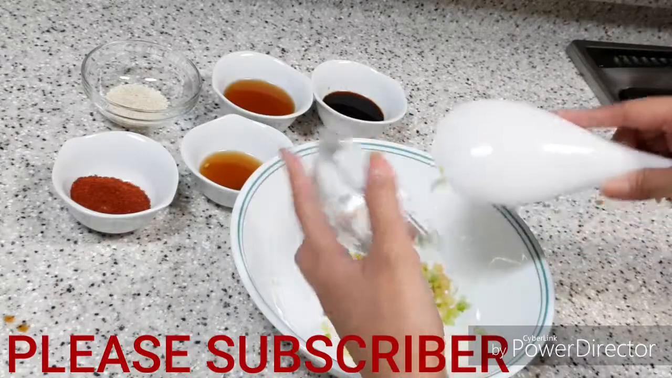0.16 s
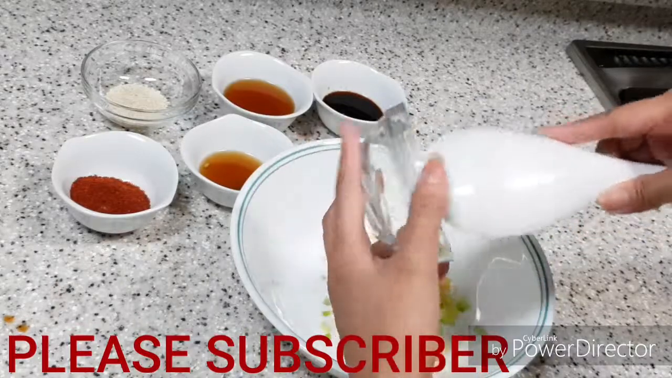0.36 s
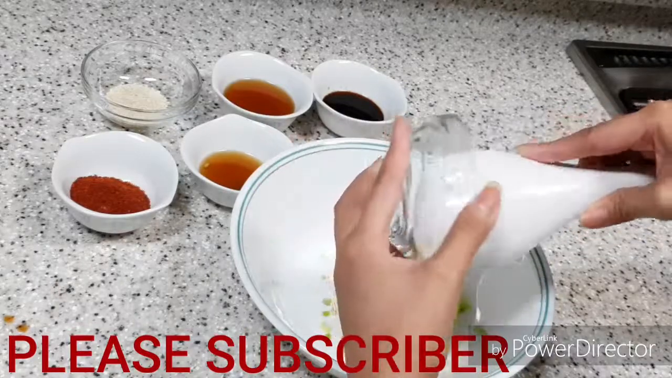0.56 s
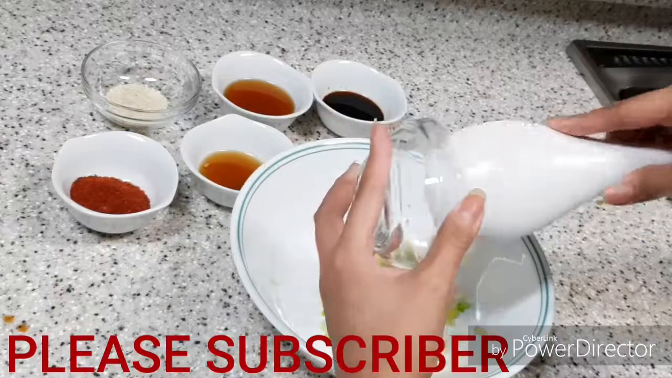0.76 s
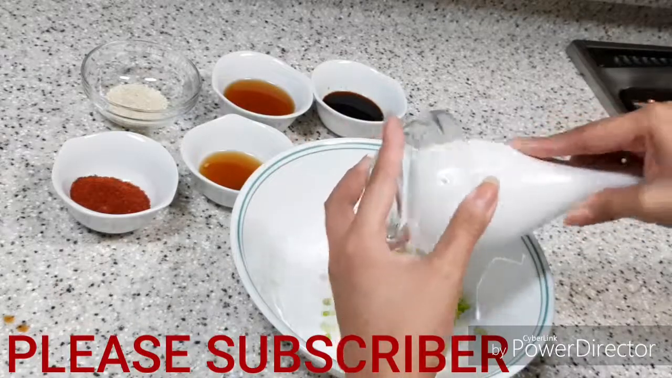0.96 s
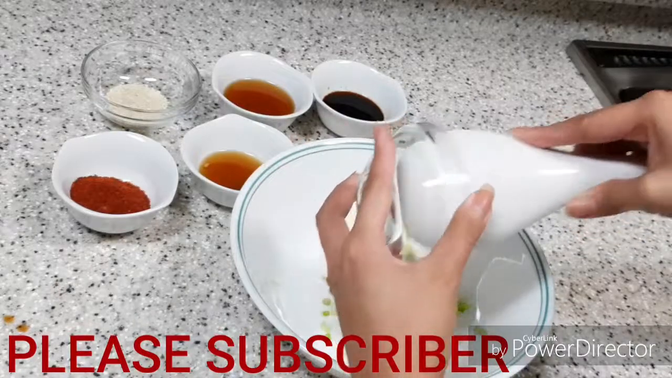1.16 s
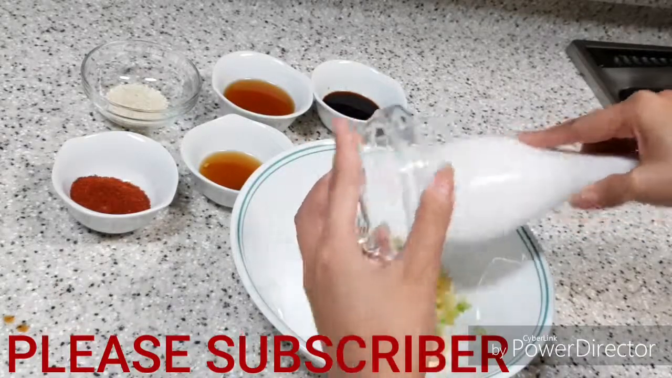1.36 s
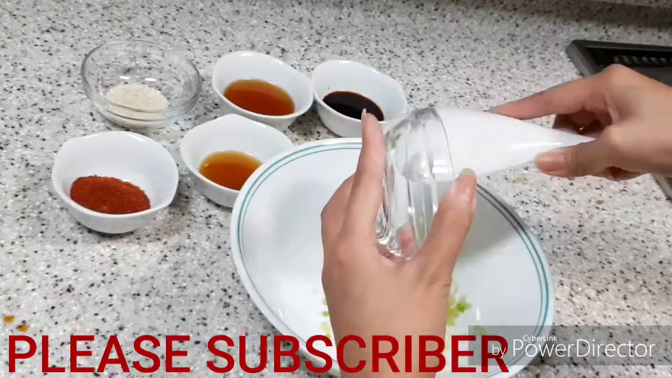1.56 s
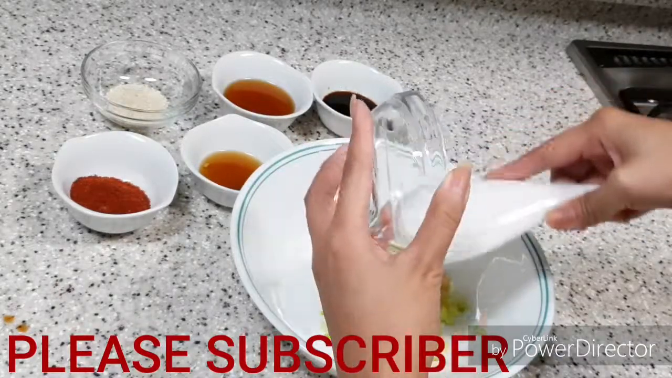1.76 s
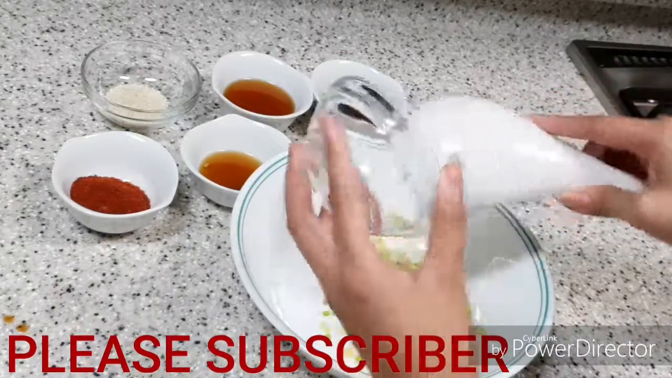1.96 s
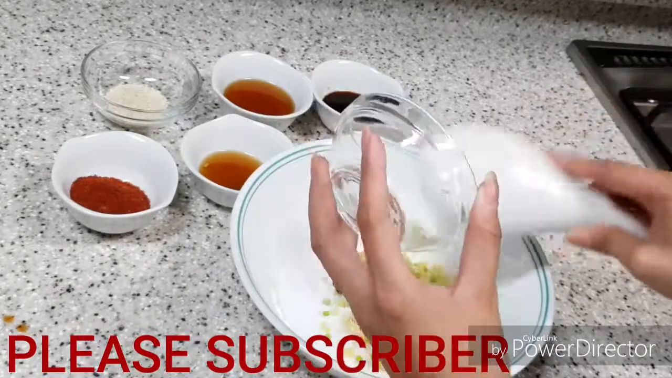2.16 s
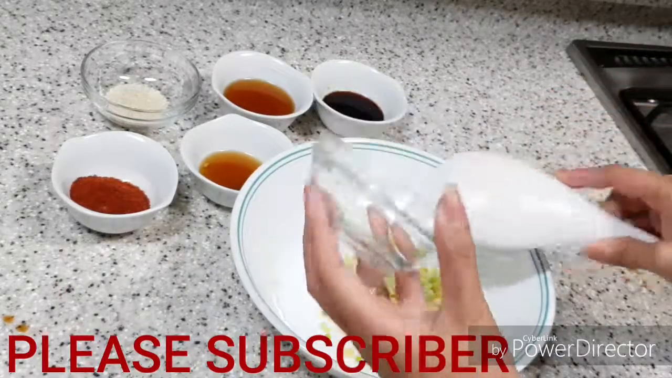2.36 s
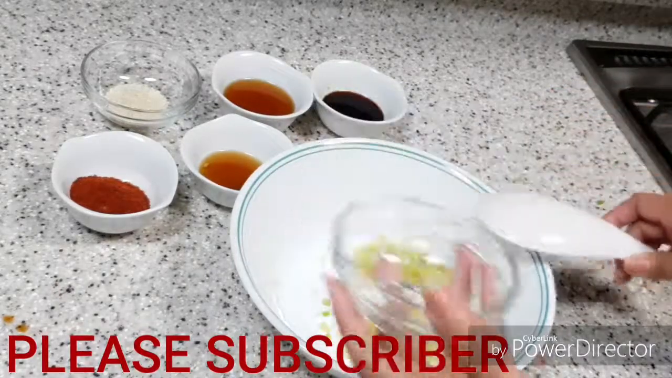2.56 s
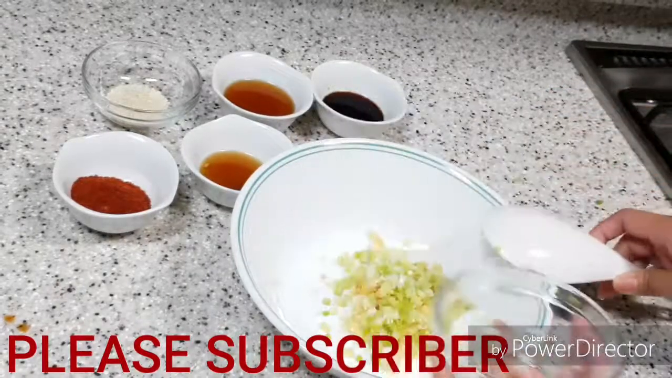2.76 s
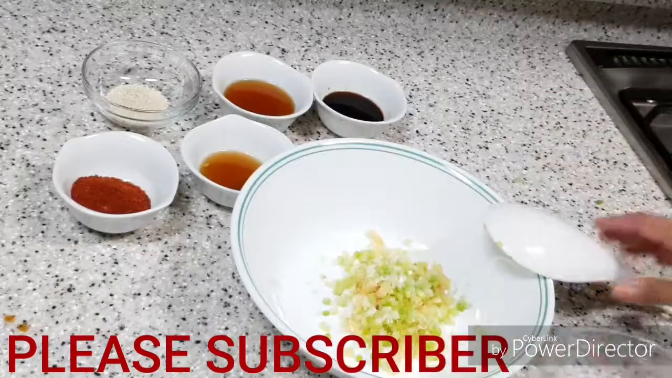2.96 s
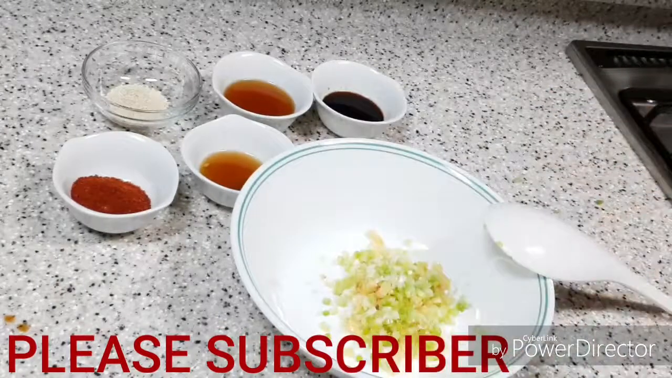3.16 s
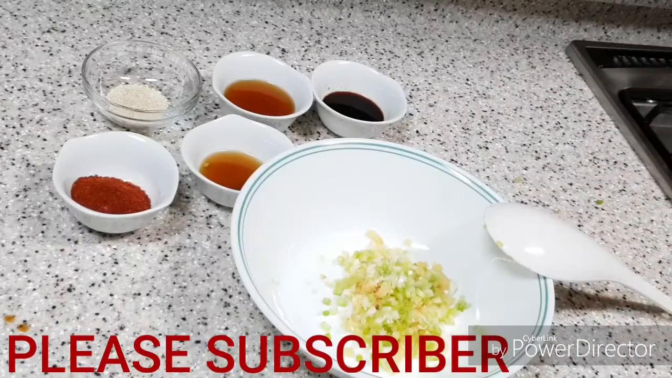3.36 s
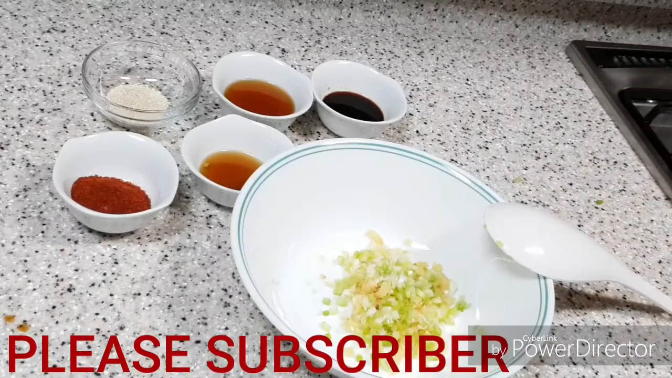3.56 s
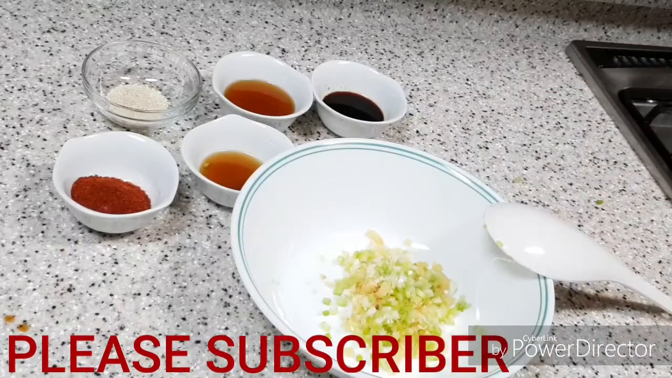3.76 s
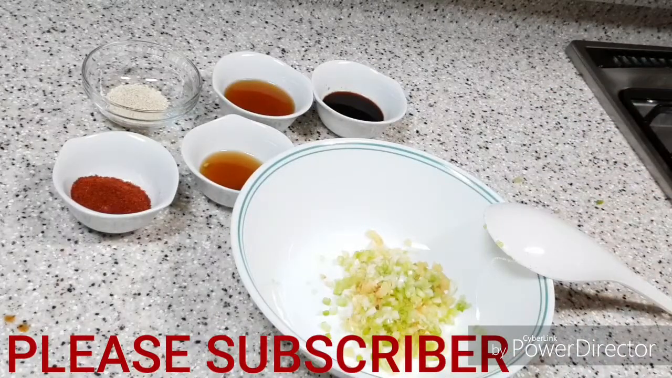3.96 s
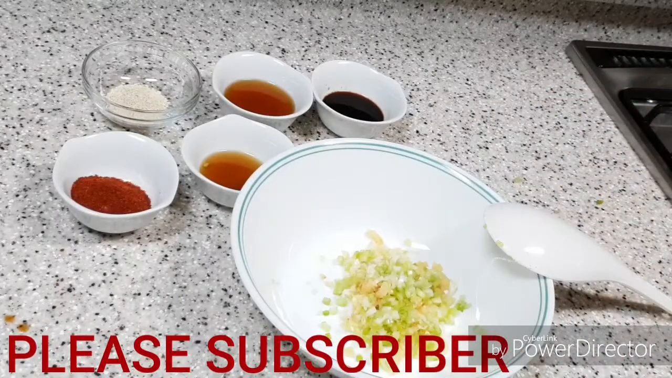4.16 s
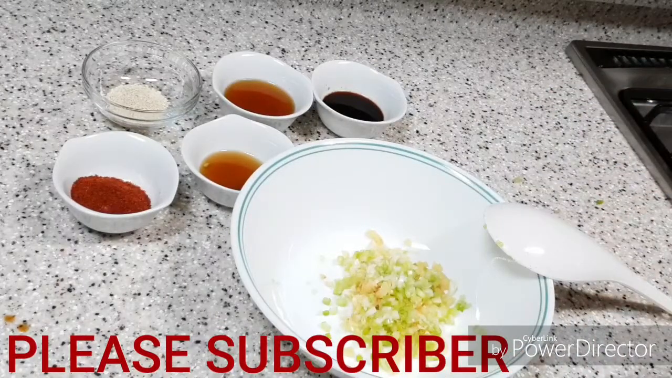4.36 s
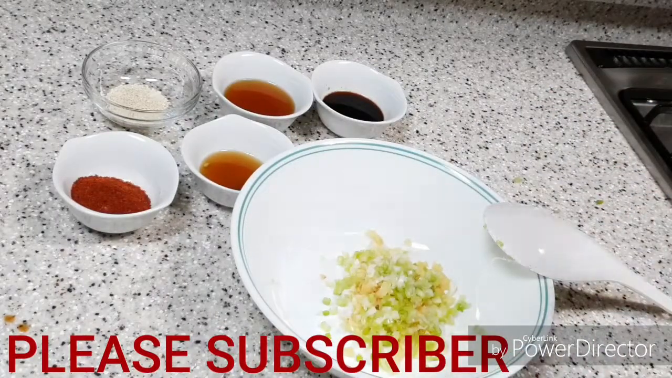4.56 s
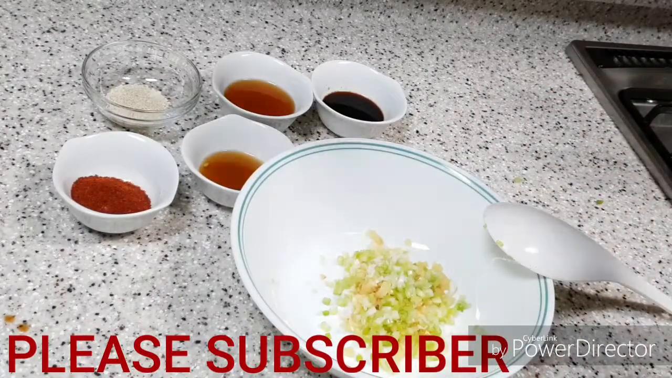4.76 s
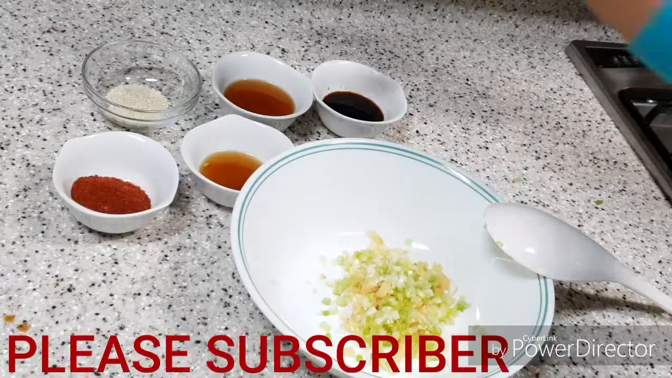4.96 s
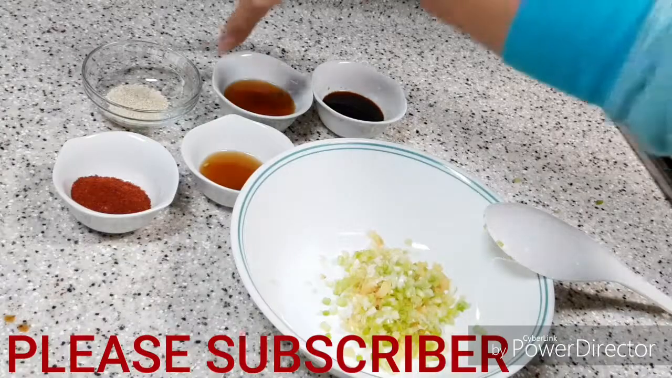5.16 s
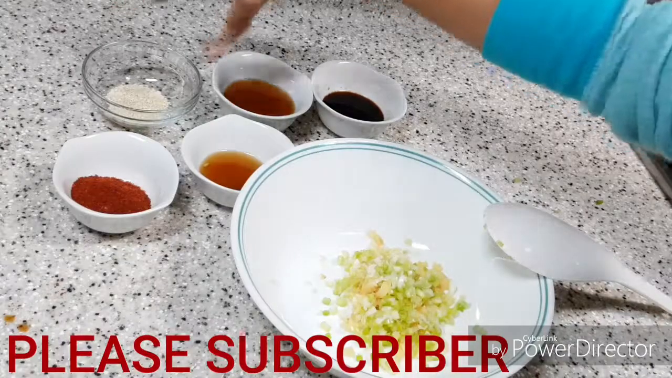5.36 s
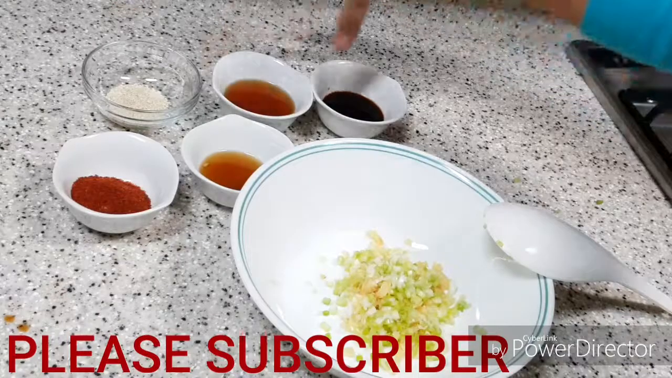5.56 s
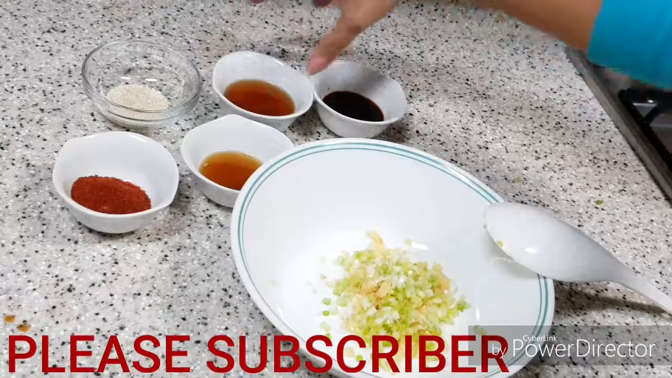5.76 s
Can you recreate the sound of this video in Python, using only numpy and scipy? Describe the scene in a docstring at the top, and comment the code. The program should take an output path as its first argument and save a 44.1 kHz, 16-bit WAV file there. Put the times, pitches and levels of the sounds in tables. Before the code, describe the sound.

Quick dry clinks of spoon on hand-held glass, two brighter ceramic clacks, and a short glass knock on stone over faint kitchen fan noise.

```python
"""Taps and scrapes of a plastic spoon on a small hand-held glass bowl, two drops on a ceramic rim, then the
glass bowl set down on stone: heard close to the microphone in a small hard kitchen.
Each blow is a noise crack, a short knock, a thud and a kick into ringing modes; rubbing is many tiny clicks.
Dense reflections come back from the walls. Behind lie a faint fan, made of shaped noise, and two low hums
that beat, made of sines."""
import sys
import numpy as np
from scipy import signal
from scipy.fft import rfft, irfft
from scipy.io import wavfile

SR = 44100
rng = np.random.default_rng(int(sys.argv[2]) if len(sys.argv) > 2 else 0)


def wrap_up_sound(samples):
    """Save the sound to the file named by the first command line argument, as 16-bit audio."""
    columns = np.atleast_2d(samples).T
    # keep every value between -1 and 1, then stretch to whole-number steps
    tamed = np.clip(columns, -1, 1)
    steps = np.round(tamed * 32767).astype(np.int16)
    wavfile.write(sys.argv[1], SR, steps)


def volts_from_decibels(level):
    """Turn decibel levels (scalar or array-like) into linear amplitude factors."""
    exponent = np.asarray(level, float) / 20
    return 10 ** exponent


N = 256220   # length [samples]
LEAD = SR // 10   # samples rendered ahead, for a tap that is already dying away

# Blows of spoon on glass, spoon on ceramic rim, and glass on stone:
# (time [s], crack level [dB], crack top [Hz], knock pitch [Hz], knock level [dB], ringing level [dB])
GLASS_TAPS = [(-.012, -22, 9100, 3980, -25.5, -31.5), (.115, -72, 900, 500, -44.5, -90),
              (.546, -29, 10300, 3020, -49, -40), (.705, -26.5, 4500, 4550, -31.5, -37),
              (.7295, -39, 5000, 4650, -23, -43), (.7345, -32.5, 4500, 2200, -39, -41.5),
              (.747, -44, 3000, 1480, -34, -35), (1.020, -26, 8600, 1690, -19.5, -57),
              (1.028, -39.5, 2990, 1393, -27.5, -55), (1.038, -22.5, 14000, 2020, -22.5, -31.5),
              (1.331, -25, 10400, 1640, -17.5, -47), (1.333, -40, 7980, 4100, -23.5, -52),
              (1.405, -17.5, 6340, 2093, -17, -28.5), (1.408, -30.5, 6000, 5560, -31, -31.5),
              (1.417, -21.5, 4010, 1370, -25.5, -49.5), (1.424, -41, 9030, 4500, -26.5, -37),
              (1.658, -23.5, 14000, 1960, -20.5, -39), (1.661, -25, 12000, 2856, -25, -42),
              (1.664, -40, 4020, 1180, -30, -44.5), (1.680, -31, 9100, 4500, -37.5, -40)]
RIM_DROPS = [(2.712, -12.5, 13000, 1927, -19.5, -18.5), (2.722, -20, 9000, 3890, -19, -34),
             (2.83, -21, 11100, 2810, -21, -40.5), (2.858, -43.5, 1000, 2440, -44, -26),
             (2.953, -11.5, 13000, 2914, -16, -26), (2.970, -18, 11980, 1850, -22.5, -49.5),
             (2.983, -18, 12000, 3420, -27, -38)]
STONE_BLOWS = [(4.129, -38, 2580, 1262, -31.5, -56), (4.137, -43, 2600, 1770, -46.5, -53.5),
               (4.150, -19, 14700, 1126, -25.5, -36), (4.162, -20.5, 10000, 4500, -19.5, -24.5),
               (4.169, -26.5, 9130, 902, -24.5, -39.5)]
# Strokes of dense small contacts on glass, rim and counter:
# (start [s], end [s], first level [dB], last level [dB], groan pitch [Hz], groan level [dB])
GLASS_SCRAPES = [(0.706, .720, -34, -33, 2100, -22), (.744, .774, -31, -38, 2185, -25),
                 (1.078, 1.105, -39, -38, 786, -19), (1.108, 1.126, -40.5, -39.5, 2290, -15),
                 (1.098, 1.15, -41, -44, 600, -18), (1.132, 1.156, -39.5, -39, 2060, -15),
                 (1.126, 1.15, -36, -42, 4480, -24), (1.372, 1.43, -36, -24, 1300, -24),
                 (1.884, 1.92, -68, -72, 1400, -8)]
RIM_CHATTER = [(2.723, 2.743, -19, -36.5, 3400, -29.5), (2.831, 2.87, -35.5, -47, 2353, -27),
               (2.96, 3, -20.5, -31, 3400, -31.5)]
COUNTER_CHATTER = [(4.154, 4.171, -24.5, -23.5, 1908, -19.5)]
# Ringing modes; the finger-damped glass has close pairs: (frequency [Hz], level [dB], 60 dB decay [s])
GLASS_MODES = [(520, -12, .08), (1330, -9, .07), (2900, -12, .1), (2020, -3, .12), (2160, -5, .1),
               (2240, -5, .16), (2560, -12, .16), (3955, -9, .15), (4400, -5, .14), (4500, -2, .18),
               (4570, -3, .15), (4700, -7, .08), (7760, -6, .1), (7870, -2, .15), (7955, -4, .17),
               (8100, -7, .1), (12080, -13, .09), (12240, -12, .09)]
CERAMIC_MODES = [(255, -12, .18), (385, -10, .1), (3945, -7, .12), (4237, -5, .1), (7560, -5, .07),
                 (10920, -8, .1), (12810, -12, .14), (1523, -8, .42), (2400, -9, .36), (3440, -6.5, .25),
                 (4640, -3, .2)]
GLASS_ON_STONE_MODES = [(175, 0, .1), (950, 0, .14), (2690, -4, .12), (4445, -6, .1), (7880, -4, .1),
                        (12170, -8, .08), (13170, -3, .12), (3040, -8, .15), (340, -5, .13), (415, -6, .1),
                        (575, -10, .15), (605, -11, .12), (785, -12, .12), (1330, -7, .14), (1855, 3, .055)]
# Broad colour of the cracks, and of plastic scraping on glass: (frequency [Hz], width [Hz], boost [dB])
GLASS_COLOUR = [(1700, 770, 7), (2860, 1300, 11), (4530, 540, 6), (7400, 3900, 8), (9100, 1800, -2.5),
                (12100, 3400, 9)]
RIM_COLOUR = [(4700, 6500, 5.5), (7450, 470, 9), (5940, 370, 3.8)]
STONE_COLOUR = [(940, 170, -1.5), (2040, 2700, 15.5), (7270, 2600, 11.5), (9100, 860, -6),
                (13000, 5400, 5.5)]
SCRAPE_COLOUR = [(532, 2800, -8), (2027, 87, 4), (3420, 1100, 7), (4500, 400, 1)]
# How long the kitchen rings: (frequency [Hz], 60 dB decay [s])
ROOM_DECAY = [(120, 0.27), (500, .42), (1500, 0.31), (4000, 0.34), (8000, 0.31), (14000, .24)]
# How alike the reflections are at left and right: (frequency [Hz], likeness [-1 to 1])
ROOM_LIKENESS = [(120, .9), (400, .9), (900, .2), (2000, -.1), (8000, -.3)]
# Relative spectrum of the fan's air noise: (frequency [Hz], density [dB per Hz])
FAN_SPECTRUM = [(20, -26), (45, -9.5), (88, -5), (177, -13.5), (215, -19), (399, -13), (1150, -31),
                (1710, -20), (2530, -32), (3340, -25.5), (4180, -29), (7110, -27.5), (14700, -35),
                (16000, -36.5)]
# Humps on that spectrum: (frequency [Hz], width [Hz], boost [dB])
FAN_PEAKS = [(1850, 220, 9), (3350, 370, 5.5), (4840, 210, 6), (6790, 94, 9), (7420, 1100, 8.5),
             (12260, 350, 8.5)]
# Slow course of the fan: (time [s], level [dB])
FAN_LEVEL = [(0, -61.5), (2.3, -61), (3.698, -63), (5.8, -61.5)]
# Mains and motor hum: (frequency [Hz], level [dB], start phase [rad])
HUMS = [(60.04, -68, 1.78), (58.26, -71, 2.38)]
# Faint overtones above the hums: (frequency [Hz], level [dB])
HUM_OVERTONES = [(119.7, -77), (177.6, -81), (403.7, -84.5), (581.4, -86.5), (721.4, -88.5)]


def spoon_on_glass():
    """Plastic taps and scrapes on thin glass: brief finger-damped ringing, close to the microphone."""
    body = struck(GLASS_TAPS, GLASS_SCRAPES, GLASS_MODES, GLASS_COLOUR, SCRAPE_COLOUR,
                  crack_s=0.0056, crack_low_hz=880, low_hz=328, thud_db=-3.5, thud_hz=459,
                  rub_ring_db=-30.0, per_s=2800, rub_hz=3670)
    return heard(body, 1.4, -1, -1, echo_db=-4.0, ring_echo_db=-9.0)


def spoon_on_rim():
    """Two drops on a ceramic rim: hard cracks, chatter that feeds the ringing, and longer modes."""
    body = struck(RIM_DROPS, RIM_CHATTER, CERAMIC_MODES, RIM_COLOUR, RIM_COLOUR,
                  crack_s=0.0048, crack_low_hz=591, low_hz=156.6, thud_db=2.0, thud_hz=390,
                  rub_ring_db=-39, per_s=3000, rub_hz=13000)
    return heard(body, 1.4, 22, 3, echo_db=-3.0, ring_echo_db=-6.5)


def glass_set_down():
    """Glass meets the stone counter in a quick run of blows, with chatter and many short modes."""
    body = struck(STONE_BLOWS, COUNTER_CHATTER, GLASS_ON_STONE_MODES, STONE_COLOUR, STONE_COLOUR,
                  crack_s=0.0096, crack_low_hz=446, low_hz=290, thud_db=-1.0, thud_hz=500,
                  rub_ring_db=-41.5, per_s=3900, rub_hz=14000)
    return heard(body, -.4, 10, 2, echo_db=-6.0, ring_echo_db=-4.0)


def struck(blows, strokes, modes, tint, rub_tint, crack_s, crack_low_hz, low_hz, thud_db, thud_hz,
           rub_ring_db, per_s, rub_hz):
    """Blows and rubbing sound at the contact and excite the body's modes. Gives (contact, ringing)."""
    cracks, knocks = impacts(blows, crack_s, thud_db, thud_hz)
    clicks = small_contacts(strokes, per_s)
    rub = rubbing(clicks, strokes, rub_tint, rub_hz)
    contact = knocks + cut(colour(cracks, tint), crack_low_hz, "high") + cut(rub, 350, "high")
    ringing = body_ringing(blows, strokes, clicks, modes, rub_ring_db)
    both = np.array([contact, ringing])[:, :N + LEAD]
    return steep_cut(both, low_hz, "high")


def impacts(blows, crack_s, thud_db, thud_hz):
    """A decaying noise crack starts a strongly damped knock, and the same noise, dulled, makes a thud."""
    t = np.arange(4096) / SR
    cracks, knocks = np.zeros((2, N + LEAD + len(t)))
    click = t == 0
    for start_s, db, top_hz, knock_hz, knock_db, _ in blows:
        start = LEAD + round(start_s * SR)
        span = slice(start, start + len(t))
        burst = rng.standard_normal(len(t))
        # the first instant stands out of the noise by 7.5 dB; soft contacts are dull
        crack = volts_from_decibels(7.5) * click + burst * np.exp(-t / crack_s)
        crack = cut(cut(crack, top_hz, "low"), 1.2 * top_hz, "low")
        cracks[span] += volts_from_decibels(db) * crack
        # the knock's pitch is set by where the blow lands
        knocks[span] += volts_from_decibels(knock_db) * ring(click + 0.092 * crack, knock_hz, t60=.022)
        thud = steep_cut(burst * np.exp(-t / 0.013), thud_hz, "low")
        knocks[span] += volts_from_decibels(db + thud_db) * thud
    return cracks, knocks


def small_contacts(strokes, per_s):
    """Sparse random clicks under the changing pressure of each stroke; one row per stroke."""
    time = (np.arange(N + LEAD + 4096) - LEAD) / SR
    hits = rng.random(len(time)) < per_s / SR
    heights = rng.standard_normal(len(time)) * np.sqrt(SR / per_s)   # same power at any density
    return pressure(strokes, time) * hits * heights


def pressure(strokes, time):
    """Each stroke bites, glides from first level to last and lets go, catching and slipping unevenly."""
    rows = []
    for start, end, first, last, *_ in strokes:
        glide = np.interp(time, [start, end], [first, last])
        bite = 9000 * np.maximum(start - time, 0)   # dB per s
        lift = 1800 * np.maximum(time - end, 0)   # dB per s
        rows.append(glide - bite - lift)
    slips_per_s, slip_db = 83, 1.5
    slips = np.interp(time * slips_per_s, np.arange(1500), rng.standard_normal(1500))
    return volts_from_decibels(np.maximum(np.array(rows), -300) + slip_db * slips)


def rubbing(clicks, strokes, tint, top_hz):
    """Coloured small clicks, with the rubbed pieces groaning at a pitch of their own."""
    rub = colour(steep_cut(clicks.sum(axis=0), top_hz, "low"), tint)
    for stroke_clicks, (*_, groan_hz, groan_db) in zip(clicks, strokes):
        rub += volts_from_decibels(groan_db) * ring(stroke_clicks, groan_hz, t60=0.044)
    return rub


def body_ringing(blows, strokes, clicks, modes, rub_ring_db):
    """Blows and rubbing feed damped modes; soft contacts and low groans miss the high modes."""
    times, _, tops, _, _, ring_db = np.transpose(blows)
    groans = np.transpose(strokes)[4]
    at = LEAD + np.round(times * SR).astype(int)
    kicks = np.zeros(clicks.shape[1])
    ringing = 0
    for hz, db, t60 in modes:
        reach = 1 / np.sqrt(1 + (hz / (2.6 * tops)) ** 4)
        kicks[at] = reach * volts_from_decibels(ring_db + rng.normal(0, 1.5, len(blows)))
        rub_reach = 1 / np.sqrt(1 + (hz / (2.7 * groans)) ** 4)
        rubbed = rub_reach @ clicks
        ringing = ringing + volts_from_decibels(db) * ring(kicks + volts_from_decibels(rub_ring_db) * rubbed, hz, t60)
    return ringing


def ring(x, hz, t60):
    """A two-pole resonance: a unit click sets a decaying sine of height 1 ringing."""
    r, w = volts_from_decibels(-60 / (t60 * SR)), 2 * np.pi * hz / SR
    return signal.lfilter([0, np.sin(w)], [1, -2 * r * np.cos(w), r * r], x + 1e-18)


def colour(x, peaks):
    """A chain of peaking filters, each boosting or dipping one region."""
    for hz, width, db in peaks:
        w, a, g = 2 * np.pi * hz / SR, np.pi * width / SR, volts_from_decibels(db / 2)
        top = [1 + a * g, -2 * np.cos(w), 1 - a * g]
        bottom = [1 + a / g, -2 * np.cos(w), 1 - a / g]
        x = signal.lfilter(top, bottom, x)
    return x


def cut(x, hz, kind):
    """Second-order low- or high-pass."""
    sos = signal.butter(2, np.clip(hz, 10, 19000), kind, fs=SR, output="sos")
    return signal.sosfilt(sos, x)


def steep_cut(x, hz, kind):
    """The same low- or high-pass run twice."""
    return cut(cut(x, hz, kind), hz, kind)


def heard(body, pan_db, lag, ring_lag, echo_db, ring_echo_db):
    """Gives (direct stereo, send to the walls); ringing leaves the whole bowl, not the contact point."""
    contact, ringing = body
    direct = placed(contact, pan_db, lag) + placed(ringing, pan_db, ring_lag)
    return direct, volts_from_decibels(echo_db) * contact + volts_from_decibels(ring_echo_db) * ringing


def placed(x, pan_db, lag):
    """Left-over-right level step and arrival lag in samples (left later when positive)."""
    late = np.concatenate([np.zeros(abs(lag)), x])[:len(x)]
    left, right = (late, x) if lag > 0 else (x, late)
    return np.array([volts_from_decibels(pan_db / 2) * left, volts_from_decibels(-pan_db / 2) * right])


def kitchen(x, gap_s=0.0013, build_s=0.00098):
    """Dense reflections: half-octave noise bands, each with its own decay and left-right likeness."""
    t = np.arange(SR // 2) / SR
    edges = 60 * 2 ** np.arange(0, 8.6, .5)
    white = rng.standard_normal((2, 2, len(t)))
    tail = 0
    for k, (low, high) in enumerate(zip(edges, edges[1:])):
        band = signal.butter(2, [low, high], "band", fs=SR, output="sos")
        mid, side = signal.sosfilt(band, white[k % 2])   # neighbouring bands are unrelated
        hz = np.sqrt(low * high)
        alike = at_hz(ROOM_LIKENESS, hz)
        stereo = np.sqrt(1 + alike) * mid + np.sqrt(1 - alike) * side * [[1], [-1]]
        tail = tail + volts_from_decibels(-60 * t / at_hz(ROOM_DECAY, hz)) * stereo
    tail = tail * (1 - np.exp(-np.maximum(t - gap_s, 0) / build_s))
    tail = tail / np.sqrt(np.sum(tail ** 2) / 2)   # unit energy per side on average
    return signal.fftconvolve(x[None], tail, axes=1)[:, :len(x)]


def at_hz(points, hz):
    """Read a table on a log-frequency axis."""
    table_hz, values = np.transpose(points)
    return np.interp(np.log(hz), np.log(table_hz), values)


def fan(lag=15, direct_share=0.33, pan_db=4.5):
    """Steady air noise, partly from one side and partly scattered, swelling a little."""
    hz = np.maximum(np.arange(N // 2 + 1) * SR / N, 1)
    shaped = irfft(rfft(rng.standard_normal((3, N))) * volts_from_decibels(at_hz(FAN_SPECTRUM, hz)), N)
    near, left, right = colour(shaped, FAN_PEAKS)
    scattered = cut(np.array([left, right]), 220, "high")   # long waves reach both sides alike
    air = np.sqrt(direct_share) * placed(near, pan_db, lag) + np.sqrt(1 - direct_share) * scattered
    level = np.interp(np.arange(N) / SR, *np.transpose(FAN_LEVEL)) + 2.4 * drift(8.6)
    return volts_from_decibels(level) * air / air.std()


def drift(rate):
    """Slow random wander: normal points of spread 1, rate of them per second, joined by lines."""
    return np.interp(np.arange(N) * rate / SR, np.arange(400), rng.standard_normal(400))


def hum():
    """Mains hum and a motor slightly below it beat about twice a second; faint overtones waver."""
    t = np.arange(N) / SR
    tones = np.zeros(N)
    for hz, db, phase in HUMS:
        tones += volts_from_decibels(db + 0.6 * drift(16.0)) * np.sqrt(2) * np.sin(2 * np.pi * hz * t + phase)
    for hz, db in HUM_OVERTONES:
        tones += volts_from_decibels(db + 0.71 * drift(1.5)) * np.sqrt(2) * np.sin(2 * np.pi * hz * t)
    return placed(tones, 1.9, 0)


def scene():
    """Three struck bodies close to the microphone, their echo in the kitchen, and the background."""
    glass, glass_send = spoon_on_glass()
    rim, rim_send = spoon_on_rim()
    stone, stone_send = glass_set_down()
    room_pan_db = 1.5   # the nearer walls are on the left
    echo = kitchen(glass_send + rim_send + stone_send)
    echo = volts_from_decibels([[room_pan_db / 2], [-room_pan_db / 2]]) * echo
    return (glass + rim + stone + echo)[:, LEAD:] + fan() + hum()


def band_limit(x):
    """A steep low-pass at the top of the band."""
    return signal.sosfilt(signal.butter(12, 16470, fs=SR, output="sos"), x)


def record(dry):
    """The right microphone port faces the dishes and is brighter; peaks round off, the very top is cut."""
    ports = dry + .2 * cut(dry, 8000, "high") * [[-1], [1]]
    rounded = np.tanh(ports)
    top_cut = signal.cheby2(8, 50, 16800, fs=SR, output="sos")
    mix = signal.sosfilt(top_cut, rounded)
    return band_limit(mix)


dry = scene()
out = record(dry)
wrap_up_sound(out)
```